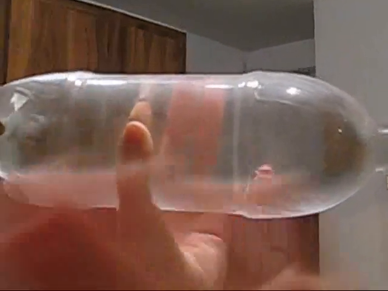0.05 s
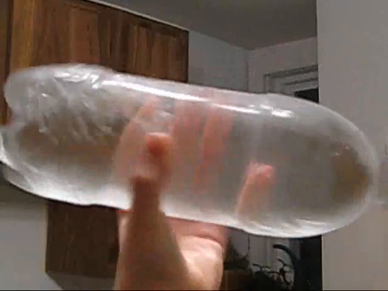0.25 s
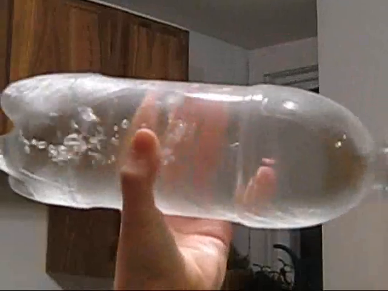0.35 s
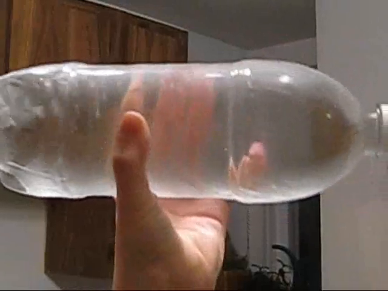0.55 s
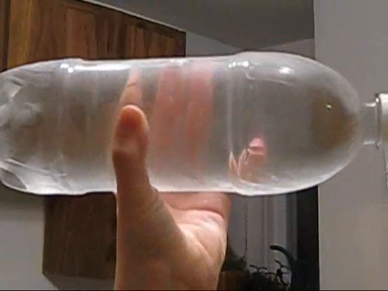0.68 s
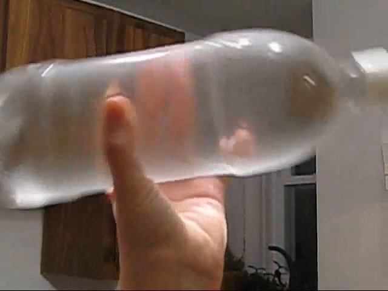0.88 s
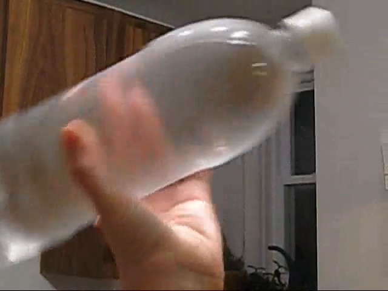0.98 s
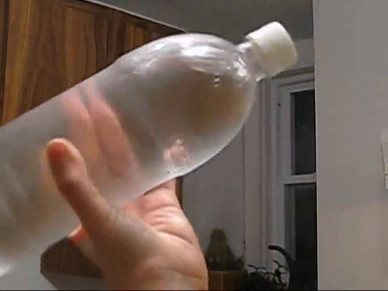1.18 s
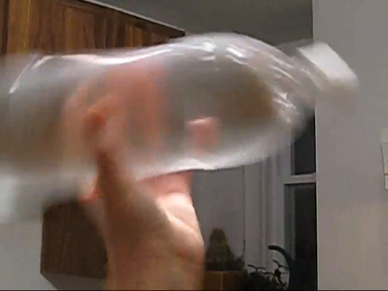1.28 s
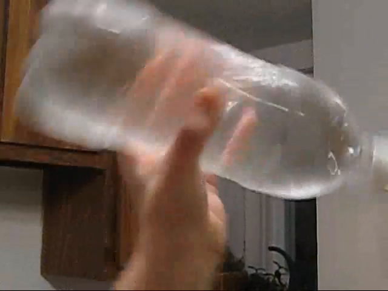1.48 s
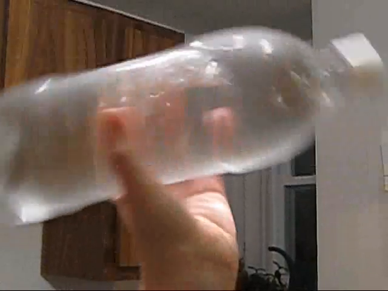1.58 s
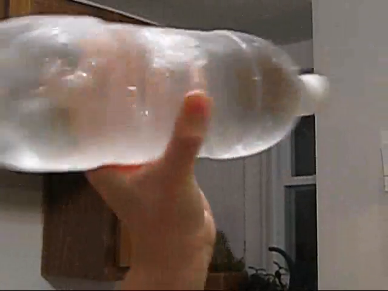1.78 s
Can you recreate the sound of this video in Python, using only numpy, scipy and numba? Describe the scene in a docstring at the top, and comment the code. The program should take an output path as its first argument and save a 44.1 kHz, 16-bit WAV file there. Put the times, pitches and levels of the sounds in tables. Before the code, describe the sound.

A plastic water bottle is knocked once, then tilted and shaken, clicking and sloshing.

```python
"""A quiet kitchen, microphone close to a plastic bottle of water, a faint appliance hum behind.
At 0.22 s a hand knocks once on the bottle: the shell rings and the microphone overloads.
The hand then tilts it: the thin wall clicks under the fingers and the water plops and fizzes.
From about 1.45 s it is shaken, with crowded clicks, louder fizz and at last a low rumble.
Throughout, a near surface returns clicks and plops about 3 ms late and the small room rings on."""
import sys
import numpy as np
from scipy import signal
from scipy.fft import rfft, irfft
from scipy.io import wavfile
from scipy.ndimage import map_coordinates
from numba import njit

SR = 44100
rng = np.random.default_rng(int(sys.argv[2]) if len(sys.argv) > 2 else 0)


def bounce(signal):
    """Save signal as a 16-bit WAV file at the path given by the first command-line argument."""
    frames = np.transpose(np.atleast_2d(signal))
    limited = np.clip(frames, -1, 1)
    pcm = np.round(limited * 32767).astype(np.int16)
    wavfile.write(sys.argv[1], SR, pcm)


N = 81585
TOP_HZ = 15600  # upper edge of the microphone's range

# spectrum of the kitchen's air noise: f/Hz, relative level/dB
AIR_SPECTRUM = [(15, -95), (25, -19), (110, -3), (156, -5.5), (289, -1), (666, -7.5), (895, -11),
                (1170, -9.5), (3440, -16.5), (7500, -24), (12200, -23.5), (15500, -32.5)]
# decay of the room's tail: f/Hz, t60/s
TAIL_DECAY = [(200, 0.27), (900, 0.4239), (3500, 0.4638), (11000, 0.21)]
# colour of the room's tail: f/Hz, relative level/dB
TAIL_COLOUR = [(200, 9.5), (900, 3), (3500, -3.5), (7000, 2), (11000, 5)]
# lag of the reflection off the near surface: t/s, delay/s
REFLECTION_LAG = [(1.3, .00297), (1.45, .00265), (1.7, .003)]
# low rumble of the shaken bottle: t/s, level/dB
RUMBLE_LEVEL = [(0, -62), (1.55, -65.5), (1.7, -50.5), (1.81, -50), (1.85, -61)]
# how hard the water sloshes: t/s, relative fizz level/dB
SLOSH_LEVEL = [(0, 1.5), (.15, -13), (.6, -6), (.68, 8), (.78, -24), (1.15, -2), (1.4, -16), (1.5, 15.5),
               (1.57, 5), (1.76, -1.5), (1.8, 14.5), (1.85, 1)]
# air pockets plopping in the water and brief rings of the wall: t/s, level/dB, f/Hz, t60/s
PLOPS_AND_RINGS = [(0.067, -29, 1300, 0.0096), (.543, -28.5, 820, 0.0086), (.668, -42.5, 1090, 0.042),
                   (0.9469, -27, 1340, 0.01), (1.217, -37.5, 3450, 0.029), (1.2825, -30, 785, 0.036),
                   (1.283, -39, 1060, 0.011), (1.324, -38, 1660, 0.031), (1.325, -35.5, 2600, 0.027),
                   (1.4505, -31.5, 672, 0.027), (1.45, -21, 1430, 0.0051), (1.4875, -27, 720, 0.014),
                   (1.49, -28.5, 1305, 0.032), (1.529, -36, 1280, 0.0095), (1.673, -42, 3840, 0.036),
                   (1.801, -38, 2030, 0.027), (1.811, -33, 3500, 0.051), (1.823, -45, 1910, 0.065)]
# buckles of the wall: t/s, level/dB, f/Hz, width/Hz, relative snap level/dB, snap f/Hz, room send/dB
BUCKLES = [(0.067, -21.5, 4060, 4500, -24, 10100, -3), (0.368, -15, 6260, 5000, -5, 11100, -6),
           (0.396, -19, 4870, 6000, 0, 11600, 0), (.4820, -26, 4130, 6000, -5.5, 11900, 2),
           (0.542, -21.5, 1800, 2230, -24, 10900, -9), (0.9459, -5.5, 2730, 2703, -60, 10030, -2),
           (0.9861, -16.5, 3830, 2950, -1, 9860, -4.5), (1.0851, -8, 4500, 5370, -8.5, 12200, -1.5),
           (1.3246, -17, 2740, 4770, -3.5, 11400, -4), (1.347, -32.5, 6100, 5000, 9.5, 10600, -7),
           (1.4502, 0.5, 4110, 1210, -25.5, 10800, -2.5), (1.457, -15.5, 4230, 2650, -10, 9700, 7.5),
           (1.4678, -8.5, 3600, 1300, -25, 11300, -22), (1.5927, -18, 2200, 1280, -25, 11000, -6),
           (1.621, -19, 4200, 1430, -23, 11000, -4.5), (1.7008, -14.5, 4850, 1700, -9.5, 9700, -8),
           (1.7016, -19.5, 2360, 1820, -11.5, 9900, -1.5), (1.7530, -35.5, 4400, 3000, 9.5, 9700, -2.5),
           (1.7858, -13.5, 2830, 2240, -18, 11100, -0.5), (1.8016, -16, 2370, 1300, -8.5, 11400, -3.5),
           (1.8047, -16, 5000, 2210, -20, 10500, -2), (1.8480, -17.5, 4130, 2170, -12, 11000, 15)]
# modes of the filled shell: f/Hz, relative level/dB, t60/s
SHELL_MODES = [(592.6, -4, 0.45), (617, -9.5, 0.4), (846, -4, 0.44), (849, -8.5, 0.55), (890, -8, 0.43),
               (936.6, -5.5, 0.73), (1005, -10, 0.53), (2630, -16, 0.22), (2640, -7, .26), (3198, -3, 0.26),
               (3360, -19, 0.38)]
# spectrum of the knock's crack: f/Hz, relative level/dB
CRACK_SPECTRUM = [(60, -20.5), (200, -16), (370, -7), (480, -19), (900, 6.5), (1120, -5), (1400, 0.5),
                  (2000, -3.5), (2550, 2), (3250, 3), (4200, -2), (4850, 2.5), (5500, -7.5), (6400, -2.5),
                  (7300, -10.5), (12500, -6.5), (15500, -31.5)]


def undb(db):
    """Decibels to gain."""
    return 10 ** (np.asarray(db) / 20)


def clock():
    """Time of each sample in s."""
    return np.arange(N) / SR


def freqs(size=N):
    """Frequency axis of the filters in Hz."""
    return np.maximum(np.arange(size + 1) * SR / (2 * size), 1e-3)


def by_time(points):
    """Read a table at each sample's time."""
    return np.interp(clock(), *np.array(points).T)


def by_hz(points, hz):
    """Read a table on a log-frequency axis."""
    table_hz, values = np.array(points).T
    return np.interp(np.log(hz), np.log(table_hz), values)


def decay(t, t60):
    """Envelope that falls 60 dB in t60 seconds."""
    return np.exp(-np.log(1000) * t / t60)


def shape(x, response):
    """Filter by a frequency response."""
    return irfft(rfft(x, 2 * N) * response)[:N]


def colour(points):
    """Minimum-phase response of a table of f/Hz, level/dB."""
    cepstrum = irfft(np.log(undb(by_hz(points, freqs()))))
    cepstrum[1:N] *= 2
    cepstrum[N + 1:] = 0
    return np.exp(rfft(cepstrum))


def resonance(hz, width, size=N):
    """Band-pass response, gain 1 at the centre; width in Hz."""
    f = freqs(size)
    return 1 / (1 + 1j * (f - hz ** 2 / f) / width)


def unit(x):
    """Scale to unit energy."""
    return x / np.sqrt(np.sum(x ** 2))


def noise(response):
    """Filtered noise with an RMS of 1."""
    return np.sqrt(N) * unit(shape(rng.standard_normal(N), response))


def add(out, at_s, x):
    """Mix a sound in at a time."""
    i = int(np.clip(round(at_s * SR), 0, N - 1))
    out[i:i + len(x)] += x[:N - i]


def room_tone(air_db=-48, hum_db=-57.5):
    """Behind everything: steady air noise and a wavering appliance hum."""
    air = noise(colour(AIR_SPECTRUM))
    hum = noise(resonance(hz=294.3, width=7) ** 2)
    return undb(air_db) * air + undb(hum_db) * hum


def kitchen(gain_db=3, start_s=0.003, build_s=0.00029):
    """Frequency response of the small room: a dense tail that dies fastest in the high treble."""
    t, tail = clock(), np.zeros(N)
    white = rfft(rng.standard_normal(N), 2 * N)
    octave = np.log2(np.clip(freqs(), 125, 16000) / 125)
    for k in range(8):
        hz = 125 * 2 ** k
        band = irfft(white * np.maximum(1 - abs(octave - k), 0))[:N]
        tail += band * undb(by_hz(TAIL_COLOUR, hz)) * decay(t, by_hz(TAIL_DECAY, hz))
    tail *= 1 - np.exp(-t / build_s)
    response = np.zeros(N)
    add(response, start_s, undb(gain_db) * unit(tail))
    return rfft(response, 2 * N)


def near_surface(x, gain_db=0.5, cutoff_hz=6850):
    """Add a duller reflection; its path, about a metre longer, changes as the bottle moves."""
    late = map_coordinates(x, [(clock() - by_time(REFLECTION_LAG)) * SR])
    return x + undb(gain_db) * shape(late, 1 / (1 + 1j * freqs() / cutoff_hz))


def low_rumble():
    """A low rumble rises as the bottle is shaken."""
    return noise(resonance(hz=140.7, width=37) ** 2) * undb(by_time(RUMBLE_LEVEL))


def bubble(hz, t60, rise=0.172):
    """Trapped air rings briefly; its pitch climbs by the fraction `rise` as it dies."""
    t = np.arange(int(t60 * SR) + 2) / SR
    cycles = hz * t * (1 + rise * t / (2 * t60))
    return np.sin(2 * np.pi * cycles) * decay(t, t60)


def water_fizz(base_db=-55.5, per_s=450, centre_hz=2325, octaves=1.5, ring_cycles=11.6):
    """Small bubbles ring at random times and pitches, louder as the water sloshes."""
    fizz = np.zeros(N)
    for when, pitch, rarity in rng.random((int(per_s * N / SR), 3)):
        hz = centre_hz * 2 ** (octaves * (2 * pitch - 1))
        boost_db = -3 * np.log(max(rarity, 0.02))  # a few stand out
        add(fizz, when * N / SR, undb(boost_db) * bubble(hz, ring_cycles / hz))
    return fizz * undb(base_db + by_time(SLOSH_LEVEL))


def plops_and_rings(attack_s=0.00019):
    """Large air pockets plop one by one, and the wall rings briefly here and there."""
    plops = np.zeros(N)
    onset = 1 - np.exp(-clock() / attack_s)
    for at_s, db, hz, t60 in PLOPS_AND_RINGS:
        ring = bubble(hz, t60)
        add(plops, at_s, undb(db) * ring * onset[:len(ring)])
    return plops


def bend(x, spread_s):
    """Bending waves carry the treble ahead of the bass; the spread is the delay at 1 kHz."""
    lag = np.exp(-4j * np.pi * spread_s * np.sqrt(1000 * freqs(len(x))))
    return irfft(rfft(x, 2 * len(x)) * lag)[:len(x)]


def rib_scatter(x, scattered_db=2, fade_s=0.00096):
    """The wave runs on round the ribbed wall for a millisecond or two, differently each time."""
    t = np.arange(512) / SR
    envelope = np.exp(-t / fade_s) * (1 - np.exp(-10 * t / fade_s))
    ribs = undb(scattered_db) * unit(rng.standard_normal(len(t)) * envelope)
    ribs[0] = 1  # the unscattered wave
    return unit(signal.fftconvolve(x, ribs)[:len(x)]) * np.linalg.norm(x)


def wall_patch(hz, width):
    """Short ring of a heavily damped patch of plastic, cut steeply above its resonance."""
    ring = irfft(resonance(hz, width, size=2048) ** 2)
    edge_hz = min(hz + 0.96 * width, TOP_HZ)
    lowpass = signal.butter(4, edge_hz, fs=SR, output="sos")
    return unit(signal.sosfilt(lowpass, ring))


def wall_clicks():
    """Each buckle kicks a patch of wall, a bright snap on top; those facing the microphone are drier."""
    direct, to_room = np.zeros(N), np.zeros(N)
    for at_s, db, hz, width, snap_db, snap_hz, room_db in BUCKLES:
        snap = undb(snap_db) * wall_patch(snap_hz, width=3200)
        click = -undb(db) * (wall_patch(hz, width) + snap)
        add(direct, at_s, rib_scatter(bend(click, spread_s=0.000481)))
        add(to_room, at_s, undb(room_db) * click)
    return direct, to_room


def knock(at_s=0.2248, dent_db=13, rebound_s=0.00143, rebound_db=15, puff_hz=55, puff_s=0.0022):
    """The wall dents and springs back with a crack; the shell rings and the hand pushes a puff of air."""
    t, direct, to_room = clock(), np.zeros(N), np.zeros(N)
    impulse = irfft(colour(CRACK_SPECTRUM))[:N]
    crack = unit(bend(impulse, spread_s=0.00093))
    modes = sum(undb(db) * np.sin(2 * np.pi * hz * t) * decay(t, t60) for hz, db, t60 in SHELL_MODES)
    ring = undb(-25) * modes
    puff = undb(-17.5) * np.sin(2 * np.pi * puff_hz * t) * np.exp(-t / puff_s)
    add(direct, at_s, undb(dent_db) * crack + ring + puff)
    add(direct, at_s + rebound_s, -undb(rebound_db) * crack)
    add(to_room, at_s, undb(15) * crack + undb(-17) * ring)
    return direct, to_room


def scene():
    """At the microphone, in mono: the bottle up close, the near surface, and the kitchen behind."""
    room, background = kitchen(), room_tone()
    blow, blow_to_room = knock()
    clicks, clicks_to_room = wall_clicks()
    rumble = low_rumble()
    bubbles = plops_and_rings() + water_fizz()
    reverb = shape(blow_to_room + clicks_to_room + undb(-4) * bubbles, room)
    return (background + reverb + rumble + near_surface(clicks + bubbles) + blow)[None]


@njit
def follow(x, attack_s, release_s):
    """Level follower, quick up and slow down."""
    out, level = np.empty(len(x)), 0.
    for i in range(len(x)):
        gap = abs(x[i]) - level
        level += gap / (SR * (attack_s if gap > 0 else release_s))
        out[i] = level
    return out


def record(dry):
    """Gain control ducks after the knock, the peak clips, and the microphone has a narrow treble notch."""
    threshold_db, slope = -16.5, 0.76
    level = follow(dry[0], attack_s=0.0023, release_s=0.035)
    excess = np.maximum(level / undb(threshold_db), 1)
    clipped = np.clip(dry[0] / excess ** slope, -1, 1)
    notched = shape(clipped, (1 - resonance(hz=7890, width=700)) ** 2)
    lowpass = signal.ellip(12, 0.2, 80, TOP_HZ, fs=SR, output="sos")
    return signal.sosfilt(lowpass, notched)[None]


dry = scene()
out = record(dry)
bounce(out)
```